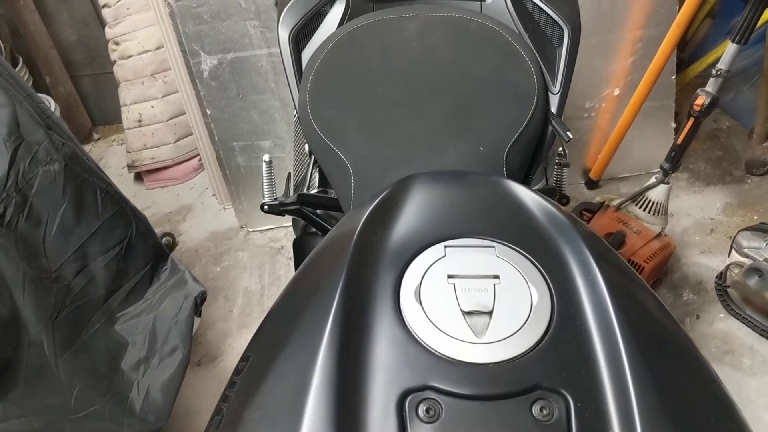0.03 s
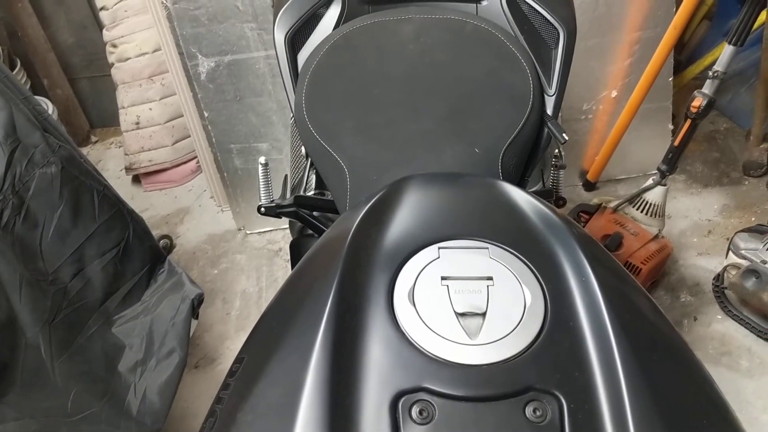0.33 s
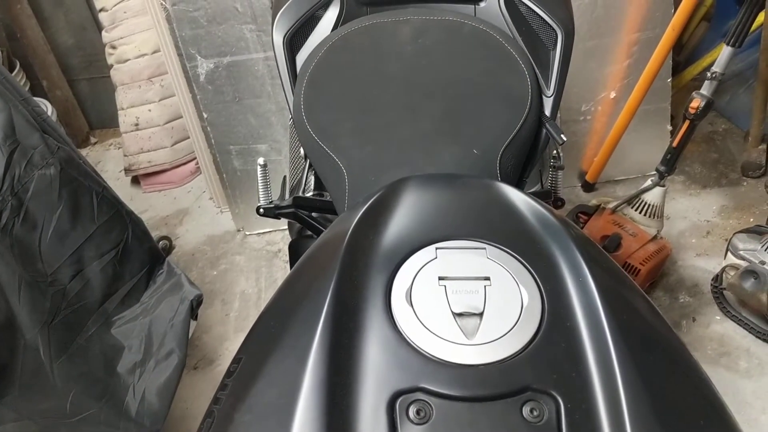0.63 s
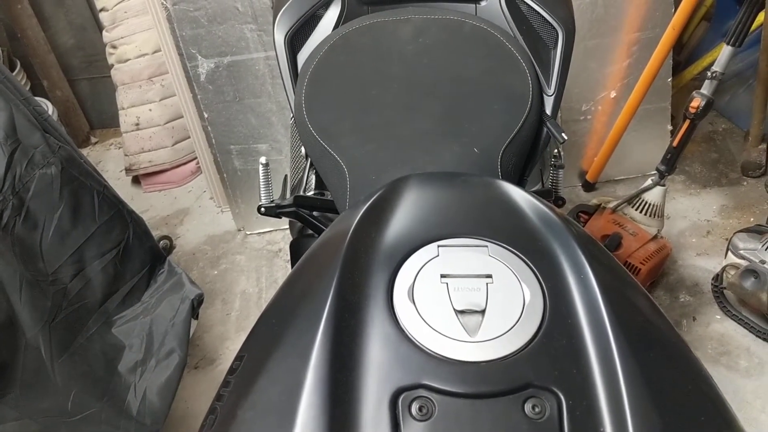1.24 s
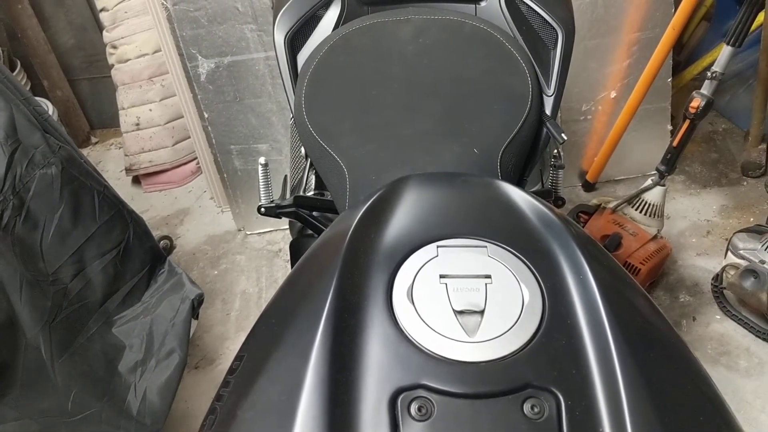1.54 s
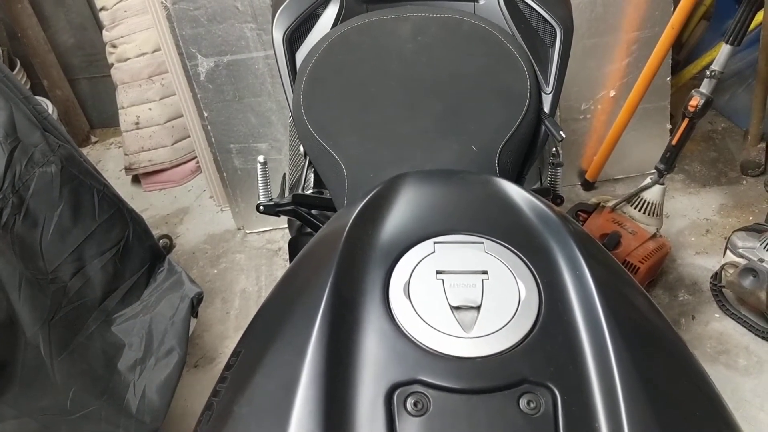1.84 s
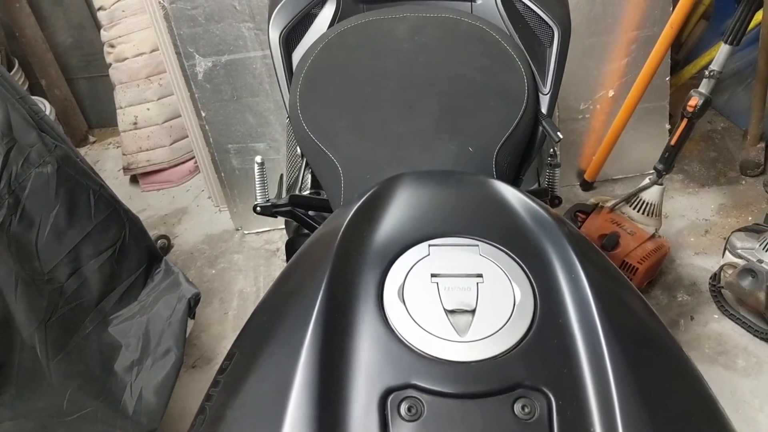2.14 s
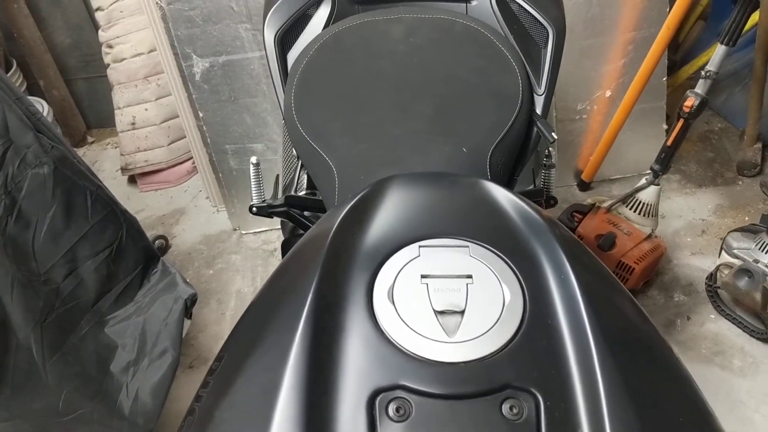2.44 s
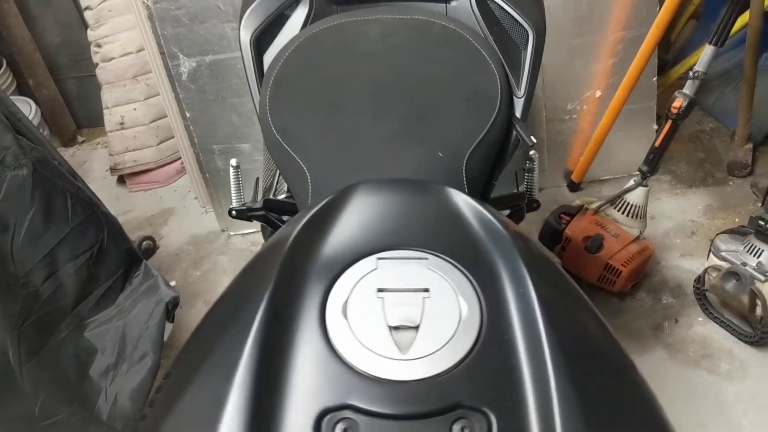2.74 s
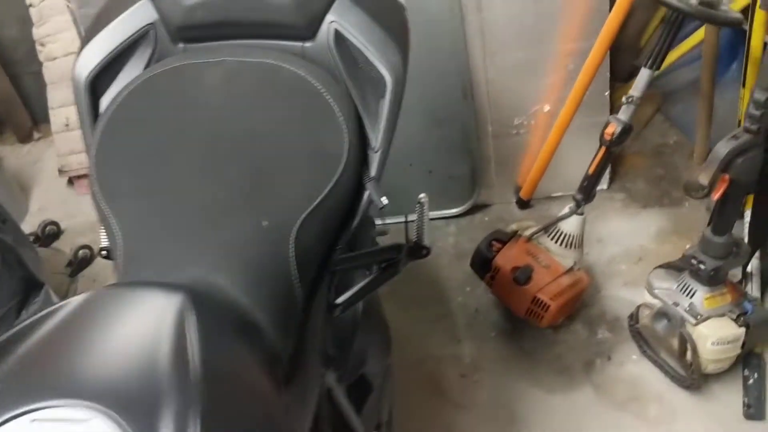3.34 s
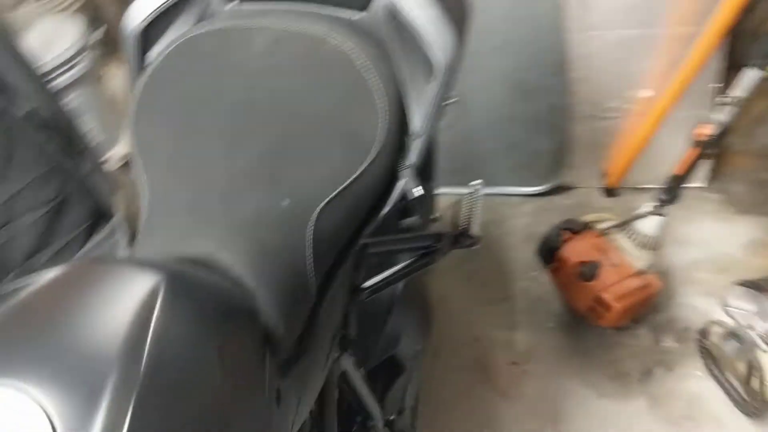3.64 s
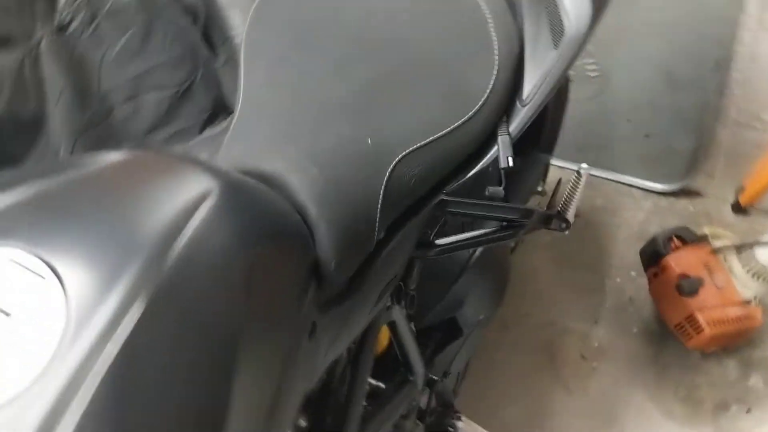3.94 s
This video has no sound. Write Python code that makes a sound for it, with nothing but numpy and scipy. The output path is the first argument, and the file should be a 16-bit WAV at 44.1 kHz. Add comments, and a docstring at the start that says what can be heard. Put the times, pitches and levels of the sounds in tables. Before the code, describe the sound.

A motorcycle engine revs up slowly, gives two sharp throttle blips, then idles in a garage.

```python
"""A V-twin motorcycle engine runs in a small garage: a slow swell in revs, two throttle blips, then idle.
Its unevenly spaced firings form a pulse train that booms through the silencer and drives the airbox
resonances into a bark. Turbulent air hisses at the throttle, valve impacts clatter, meshing gears whine
and a loose metal part jingles. The walls add standing waves and a short reverberation.
Late on, the treble fades as the microphone swings away from the engine."""
import sys
import numpy as np
from scipy import signal
from scipy.fft import rfft, irfft, next_fast_len
from scipy.io import wavfile
from scipy.ndimage import uniform_filter1d, map_coordinates

SR = 44100
rng = np.random.default_rng(int(sys.argv[2]) if len(sys.argv) > 2 else 0)


def store_pcm(level_fs):
    """Save levels as 16-bit WAV."""
    pcm = np.round(np.clip(level_fs, -1, 1) * 32767).astype(np.int16)
    wavfile.write(sys.argv[1], SR, np.atleast_2d(pcm).T)


N = 176400
TIME = np.arange(N) / SR
IDLE_RATE = 15  # cycles per second


# Engine speed. Each row: time in seconds, cycles per second.
ENGINE_SPEED = [(0, 18.4), (.1, 18.2), (.2, 19.8), (.3, 19.4), (.6, 22), (.78, 25.3), (.9, 28.2),
                (.97, 28.9), (1.08, 32), (1.15, 32.1), (1.24, 29.8), (1.38, 22.8), (1.5, 19.5), (1.62, 17),
                (1.73, 17.8), (1.84, 35.4), (1.92, 32), (2.05, 24.3), (2.17, 19.2), (2.3, 16.7),
                (2.39, 17.7), (2.52, 37.5), (2.6, 33.2), (2.74, 25.5), (2.88, 19.5), (3, 17.4), (3.1, 17.7),
                (3.2, 19), (3.38, 16), (3.48, 15.9), (3.65, 14.5), (3.88, 13.4), (4, 13.7)]

def crank():
    """Phase is the integral of speed; one four-stroke cycle is two turns of the crank."""
    speed, = curves(ENGINE_SPEED)
    cycle = 0.55 + np.cumsum(speed) / SR
    return cycle, speed


# Firings that kick hard or nearly fail. Each row: time in seconds, level in dB re a normal firing.
UNEVEN_FIRINGS = [(.11, -10.5), (1.55, 3.5), (1.667, 0), (1.72, -4.5), (2.222, 5), (2.26, -9.5),
                  (2.28, -22), (2.34, 0.5), (2.9, 4), (2.955, -25), (2.99, -4.5), (3.013, 5), (3.288, 4.5),
                  (3.385, -19), (3.408, 7.5), (3.668, 1), (3.885, 2.5)]

def firings(cycle, speed, second_lag_cycles=3 / 8, second_db=2.5, idle_jitter_s=0.00054):
    """Impulse excitation: two cylinders fire once a cycle each, less regularly at low revs."""
    phases = np.arange(128)[:, None] + [0, second_lag_cycles]
    at = np.interp(phases, cycle, np.arange(N), right=2 * N)
    lope = (IDLE_RATE / np.interp(phases, cycle, speed)) ** 2
    at = at + idle_jitter_s * SR * lope ** 2 * rng.standard_normal(phases.shape)
    spread_db = 3 + 0.9 * lope
    size_db = spread_db * np.clip(rng.standard_normal(phases.shape), -2, 1)
    for s, db in UNEVEN_FIRINGS:
        size_db.flat[np.argmin(np.abs(at - s * SR))] = db
    size = amp(size_db + [0, second_db])
    heard = (at < N) & (phases > cycle[0] - .25)
    return np.bincount(np.abs(at[heard]).astype(int), size[heard], N)


# Exhaust boom. Each row: time in seconds, level in dB.
BOOM_LEVEL = [(0.0, -16.5), (0.35, -19.5), (0.65, -17), (0.8, -29.5), (0.95, -21), (1.17, -25.5),
              (1.26, -17.5), (1.36, -26.5), (1.48, -19.5), (1.68, -18), (1.8, -14), (1.98, -15.5),
              (2.1, -17.5), (2.29, -21.5), (2.42, -14.5), (2.65, -15), (2.8, -18.5), (3.15, -19.5),
              (3.35, -20), (4.0, -20)]
# Silencer response. Each row: frequency in Hz, gain in dB.
SILENCER = [(25, -34.5), (38, -52.5), (50, -2.5), (60, 3.5), (73, 2.5), (90, 3.5), (115, -1.5), (135, -11),
            (160, -7), (190, -16.5), (300, -53), (600, -80), (4000, -140)]
# Standing waves of the garage. Each row: frequency in Hz, bandwidth in Hz, gain in dB.
STANDING_WAVES = [(58, 21, -9.5), (90.3, 9.7, 1), (113.7, 6.4, 3), (144.5, 10, -2.5), (173.3, 9.3, -5.5)]

def exhaust(pulses, cycle, speed, drone_db=-31, full_overrun=14):
    """Acoustic filtering: the silencer passes the firings' low harmonics, which excite the room modes."""
    level_db, = curves(BOOM_LEVEL)
    turbulence = amp(-8) * (IDLE_RATE / speed) ** 2 * puffs(pulses, decay_s=.025)
    # Falling revs add a drone at three times the cycle rate.
    slowing = -np.gradient(speed) * SR  # cycles per second squared, as is full_overrun
    overrun = uniform_filter1d(np.clip(slowing / full_overrun, 0, 1), size=2000)
    drone = amp(drone_db) * overrun * np.cos(2 * np.pi * 3 * cycle)
    boom = coloured(unit(pulses) + turbulence + drone, SILENCER)
    return amp(level_db) * levelled(boom + resonate(boom, STANDING_WAVES) + amp(-5.5) * garage(boom))


# Intake strength. Each row: time in seconds, then relative levels of bark, honk and rasp in dB.
INTAKE_LEVELS = [(0.0, -31.5, -37, -48.5), (0.3, -29, -35.5, -49.5), (0.6, -25.5, -30, -46),
                 (0.76, -25.5, -35.5, -41.35), (0.92, -20.5, -33, -37), (1.12, -26.5, -34, -37),
                 (1.35, -31, -39.5, -48), (1.7, -29, -42, -63), (1.75, -25.5, -30.5, -36.5),
                 (1.8, -19.5, -17.5, -31.5), (1.93, -33.5, -39, -43), (2.1, -27.5, -43, -46),
                 (2.22, -32.5, -45, -57.5), (2.29, -39, -65, -56), (2.35, -27, -46, -49),
                 (2.42, -21.5, -23, -36), (2.48, -19, -24, -33.5), (2.63, -31, -36.5, -41),
                 (2.85, -29, -48.5, -51), (3.35, -34.5, -40, -57.5), (3.55, -27.5, -70, -49),
                 (4.0, -31.5, -34, -85.5)]
# Airbox resonances in three groups. Each row: frequency in Hz, bandwidth in Hz, gain in dB.
BARK_MODES = [(134.6, 17, -6), (163, 21.5, -3.5), (218, 6.4, 2.5), (245.5, 30, -2), (299, 20, 6.5),
              (332.5, 39, -4)]
HONK_MODES = [(221.6, 9.9, -2.5), (376, 7.2, -5.5), (392.3, 12.4, 0.5)]
RASP_MODES = [(508.2, 10, 0.5), (569.6, 34, -12), (666, 140, -10), (769, 21, -8), (815, 130, 2),
              (820, 50, -21)]

def intake(pulses):
    """Cavity resonance: each gulp rings the airbox; an open throttle adds a honk and a higher rasp."""
    bark_db, honk_db, rasp_db = curves(INTAKE_LEVELS)
    gulps = unit(pulses)
    bark = resonate(gulps + amp(-7.5) * puffs(pulses, decay_s=0.013), BARK_MODES)
    bark = coloured(bark, [(70, -18), (135, 5.5), (345, -3), (420, -16), (500, -31), (1000, -16),
                           (4000, -75.5), (10000, -110)])
    honk = resonate(gulps + amp(-17) * puffs(pulses, decay_s=0.0028), HONK_MODES)
    honk = coloured(honk, [(120, -23.5), (210, -0.5), (415, -7), (470, -11.5), (1000, -25),
                           (4000, -62.5), (10000, -110)])
    rasp = resonate(gulps + amp(4) * puffs(pulses, decay_s=0.021), RASP_MODES)
    rasp = coloured(rasp, [(200, -47.5), (480, 7.5), (880, -5.5), (1050, -4.5), (1800, -9),
                           (3500, -17.5), (8000, -33.5), (11000, -77)])
    return (amp(bark_db - 3) * levelled(bark)
            + amp(honk_db - 2.45) * levelled(honk)
            + amp(rasp_db - 2.5) * levelled(rasp))


# Air rush as the throttle snaps open. Each row: start in seconds, level in dB.
THROTTLE_BLIPS = [(1.744, -51), (2.41, -47)]

def throttle_hiss(pulses, attack_s=0.016, hold_s=0.048, release_s=0.025):
    """Turbulent flow: air tears past the throttle with each gulp, hardest as it snaps open."""
    rasp_db = curves(INTAKE_LEVELS)[2]
    flow = amp(rasp_db - 13)
    for start, db in THROTTLE_BLIPS:
        age = TIME - start
        rise = np.clip(age / attack_s, 0, 1)
        fall = np.exp(-np.maximum(age - hold_s, 0) / release_s)
        flow = flow + amp(db) * rise * fall
    spectrum = [(400, -20), (1300, 16), (3000, -0.5), (5000, 1.5), (9000, -4.5),
                (12000, -24.5), (16000, -19)]
    return flow * levelled(coloured(puffs(pulses, decay_s=0.031), spectrum))


# Spectrum of the mechanical noise. Each row: frequency in Hz, relative level in dB.
CLATTER_SPECTRUM = [(150, -4.5), (600, -3.5), (1000, -5), (1500, 1), (2100, -1), (3200, -4.5), (4300, -4.5),
                    (5600, -7.5), (6700, -13), (8200, -16), (9500, -25.5), (11200, -38.5), (15000, -39)]

def valve_gear(cycle):
    """Impact noise: valves tick shut four times a cycle over the wash of belts and bearings."""
    closings = np.diff(np.floor(4 * cycle), prepend=0)
    ticks = closings * amp(2 * np.clip(rng.standard_normal(N), -2, 1))
    wash = rng.standard_normal(N)
    return unit(coloured(wash + amp(-5) * puffs(ticks, decay_s=0.0022), CLATTER_SPECTRUM))


# Upper gear meshes. Each row: frequency as a multiple of the cycle rate, relative level in dB.
UPPER_MESHES = [(200, -12), (266, -12.5), (400, -18.5)]
# Casing response. Each row: frequency in Hz, gain in dB.
CASING_RESPONSE = [(1500, -18.5), (2600, -6.5), (2900, -0.5), (3150, -11), (3400, -0.5), (3580, -1.5),
                   (3770, 1.5), (3950, -2), (4220, 4), (4450, -1.5), (4750, -1.5), (5200, -2.5), (5800, -3),
                   (6300, -11), (8000, -20), (12000, -34.5)]

def gears(cycle, speed, teeth_per_cycle=132.5, halving_accel=61, speed_exponent=0.62):
    """Forced vibration: mesh tones follow the crank and flare as they cross the casing's resonances."""
    flutter = .15 * np.sin(2 * np.pi * 2 * cycle) + .2 * wobble(260)
    whine_db = -5.5 + 3 * np.clip(wobble(45), -2, 1)
    whine = amp(whine_db) * np.sin(2 * np.pi * (teeth_per_cycle * cycle + flutter))
    accel = uniform_filter1d(np.abs(np.gradient(speed) * SR), size=1000)  # cycles per second squared
    whine /= 1 + accel / halving_accel  # quick changes of speed mute the main mesh
    upper = np.zeros(N)
    for order, db in UPPER_MESHES:
        gain = amp(db + 3 * np.clip(wobble(30), -2, 1))
        upper += gain * np.sin(2 * np.pi * (order * cycle + .22 * wobble(330)))
    return coloured((whine + upper) * (speed / speed.mean()) ** speed_exponent, CASING_RESPONSE)


# Strength of valves and gears together. Each row: time in seconds, gain in dB.
MACHINERY_GAIN = [(0.0, -45), (0.7, -44.5), (0.86, -38.5), (1.17, -37.5), (1.35, -40), (1.6, -43.5),
                  (1.72, -43.5), (1.78, -38.5), (2.05, -45.5), (2.33, -46), (2.45, -39), (2.85, -45.5),
                  (3.02, -46), (3.15, -43), (3.3, -45), (3.6, -42.5), (4.0, -43.5)]

def machinery(cycle, speed):
    """Amplitude modulation: valve clatter and gear whine swell and fade under one envelope."""
    gain_db, = curves(MACHINERY_GAIN)
    return amp(gain_db) * (amp(-3) * valve_gear(cycle) + gears(cycle, speed))


# Steady buzz of the loose part. Each row: time in seconds, relative level in dB.
BUZZ_LEVEL = [(0, -70.5), (.7, -70), (.87, -64), (1.2, -68), (1.55, -78), (1.8, -76), (2.3, -81),
              (2.45, -75), (2.95, -81), (4, -82.5)]
# Its jingles. Each row: start in seconds, relative level in dB.
JINGLE_EVENTS = [(.035, -56), (.146, -64), (.255, -61), (.39, -68), (.45, -68), (.5, -67), (.589, -67),
                 (.84, -58), (.885, -55), (.968, -60), (1.05, -58), (1.154, -57), (1.222, -61), (1.29, -61),
                 (1.365, -64), (1.766, -62), (1.95, -67), (2.14, -70), (2.44, -60), (2.614, -66),
                 (2.688, -66), (3.14, -66), (3.435, -68)]
# Its modes. Each row: frequency in Hz, gain in dB, time to decay by 60 dB in seconds.
METAL_MODES = [(4886, 4, 0.081), (5800, -7, 0.037), (7650, 2, 0.04), (9930, -2.5, 0.04),
               (10520, -10.5, .03), (11750, -10, .035), (15480, -27, .04)]

def loose_metal(pulses, attack_s=0.0027, hold_s=0.01, release_s=0.01):
    """Modal ringing: a thin part buzzes with the firings and jingles, each time in a new mix of modes."""
    buzz_db, = curves(BUZZ_LEVEL)
    buzz = amp(buzz_db) * puffs(pulses, decay_s=0.01)
    t = np.arange(SR // 4) / SR
    burst = np.minimum(t / attack_s, 1) * np.exp(-np.maximum(t - hold_s, 0) / release_s)
    starts, level_db = np.transpose(JINGLE_EVENTS)
    contacts = unit(rng.standard_normal(N) ** 3)  # cubing makes the noise spiky
    out = np.zeros(N)
    for hz, db, t60 in METAL_MODES:
        sizes = amp(level_db + rng.normal(0, 1.3, len(starts)))
        onsets = np.bincount((starts * SR).astype(int), sizes, N)
        shake = buzz + contacts * signal.fftconvolve(onsets, burst)[:N]
        ring = np.sin(2 * np.pi * hz * t) * amp(-60 * t / t60) * (1 - np.exp(-t / 0.00085))
        out += amp(db) * signal.fftconvolve(shake, ring / np.linalg.norm(ring))[:N]
    return out


# Garage reverberation. Each row: frequency in Hz, time to decay by 60 dB in seconds.
REVERB_TIMES = [(100, 0.29), (500, 0.53), (3000, 0.059), (10000, 0.3)]

def garage(x, delay_samples=300):
    """Diffuse reverberation: reflections from the close walls merge into a short, dying tail."""
    hz, t, noise = signal.stft(rng.standard_normal(SR // 2), SR, nperseg=256)
    decay = amp(-60 * t / along(REVERB_TIMES, hz)[:, None])
    tail = signal.istft(noise * decay, SR, nperseg=256)[1]
    return signal.fftconvolve(np.pad(x, (delay_samples, 0)), tail / np.linalg.norm(tail))[:N]


def turned_away(x, start_s=2.6, fade_db_per_s=5, corner_hz=6000):
    """Directivity: the treble fades as the microphone swings away from the engine."""
    treble = filtered(x, lambda hz: 1 - 1 / (1 + (hz / corner_hz) ** 2))
    treble_gain = amp(-fade_db_per_s * np.maximum(TIME - start_s, 0))
    return x + treble * (treble_gain - 1)


def amp(db):
    """Decibels to amplitude ratio."""
    return 10 ** (np.asarray(db) / 20)


def unit(x):
    """Normalisation to rms 1."""
    return x / np.sqrt(np.mean(x ** 2) + 1e-20)


def levelled(x, size=4000):
    """Gain control: the slow level is held at rms 1, leaving the single beats."""
    power = uniform_filter1d(uniform_filter1d(x * x, size), size)
    return x / np.sqrt(np.abs(power) + 1e-20)


def along(points, hz):
    """Interpolation of (Hz, value) points on a log frequency axis."""
    f, values = np.transpose(points)
    return np.interp(np.log(hz + 1), np.log(f + 1), values)


def curves(rows):
    """Linear interpolation: one value per sample for each column after the time."""
    times, *columns = np.transpose(rows)
    return [np.interp(TIME, times, column) for column in columns]


def wobble(rate):
    """Random modulation: a smooth curve with rate knots a second."""
    return map_coordinates(rng.standard_normal(1024), [TIME * rate], mode="mirror")


def puffs(pulses, decay_s):
    """Exponential decay: a dying burst of noise follows each pulse."""
    envelope = signal.lfilter([1], [1, -np.exp(-1 / (decay_s * SR))], pulses)
    return unit(envelope * rng.standard_normal(N))


def filtered(x, response):
    """Linear filtering: the spectrum is multiplied by a frequency response."""
    size = 2 * next_fast_len(N // 2 + SR // 4)
    return irfft(rfft(x, size) * response(np.fft.rfftfreq(size, 1 / SR)), size)[..., :N]


def coloured(x, points):
    """Minimum-phase filtering with the gain of (Hz, dB) points."""
    def response(hz):
        cepstrum = irfft(np.log(amp(along(points, hz))))
        half = len(cepstrum) // 2
        cepstrum[1:half] *= 2
        cepstrum[half + 1:] = 0
        return np.exp(rfft(cepstrum))
    return filtered(x, response)


def resonate(x, modes):
    """Damped resonators in parallel, each given as (Hz, bandwidth in Hz, dB)."""
    return filtered(x, lambda f: sum(amp(db) * 1j * f * width / (hz * hz - f * f + 1j * f * width)
                                     for hz, width, db in modes))


def scene():
    """Superposition: one crank drives the engine's layers, which add up in the garage."""
    cycle, speed = crank()
    pulses = firings(cycle, speed)
    machine = machinery(cycle, speed)
    upper = turned_away(intake(pulses) + throttle_hiss(pulses) + machine) + loose_metal(pulses)
    return (exhaust(pulses, cycle, speed) + upper + amp(-9) * garage(upper))[None]


def record(dry, top_hz=15700):
    """Band limiting: nothing passes above top_hz."""
    return filtered(dry, lambda hz: hz < top_hz)


dry = scene()
out = record(dry)
store_pcm(out)
```